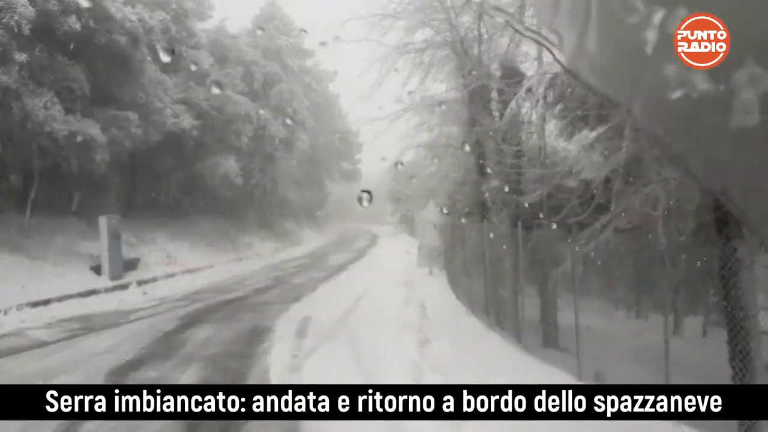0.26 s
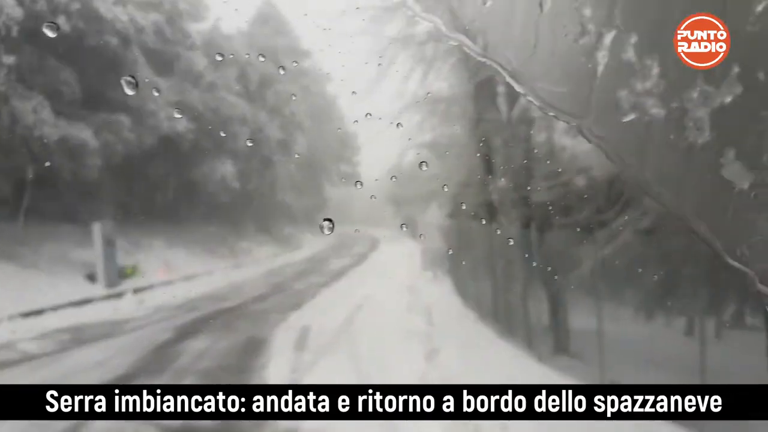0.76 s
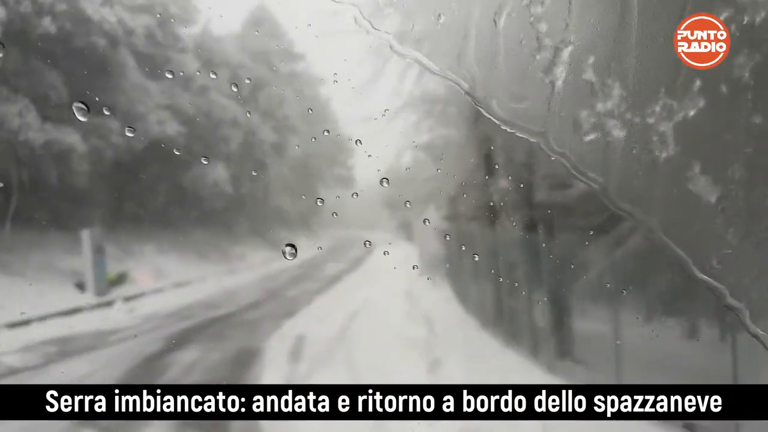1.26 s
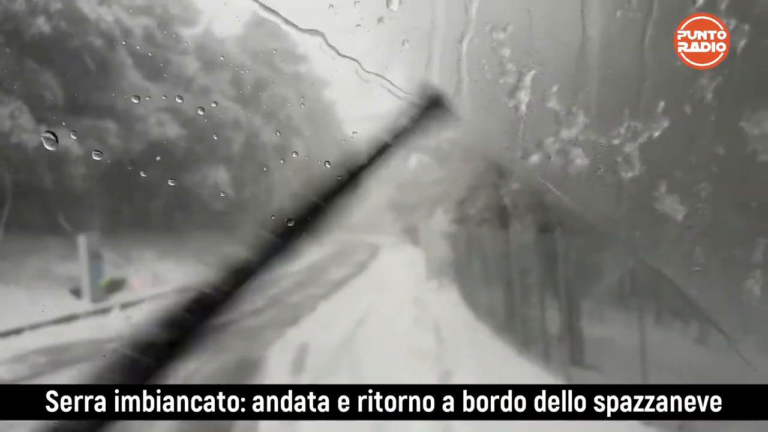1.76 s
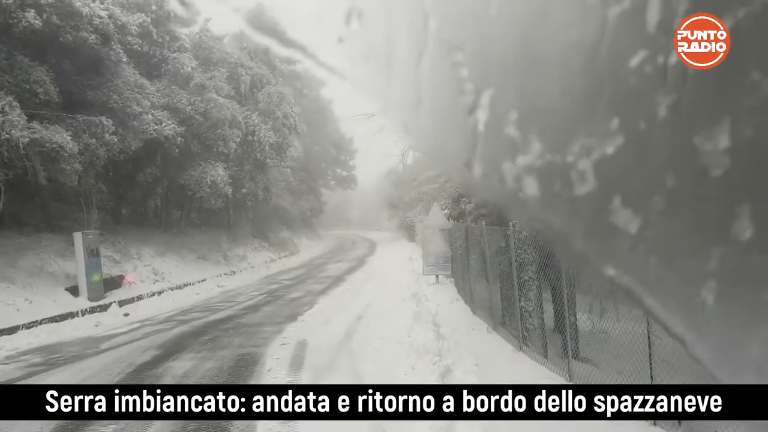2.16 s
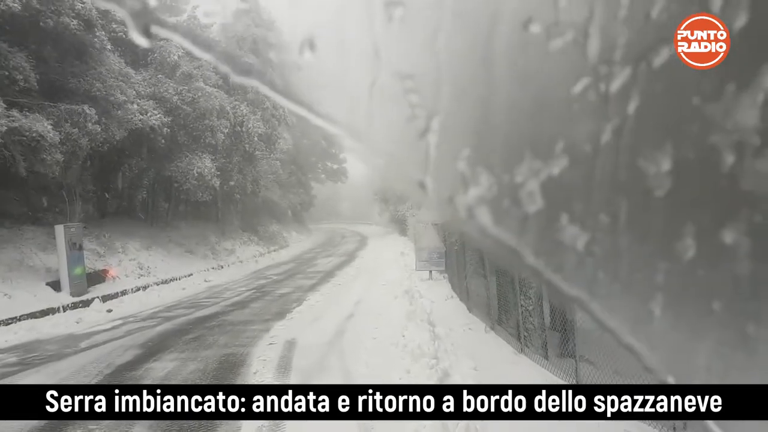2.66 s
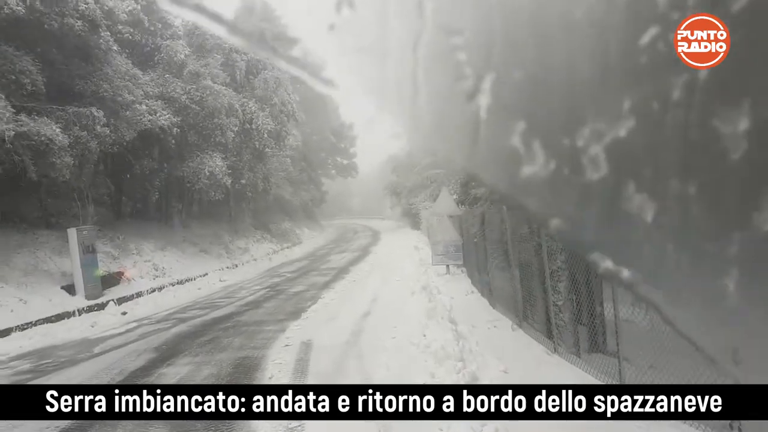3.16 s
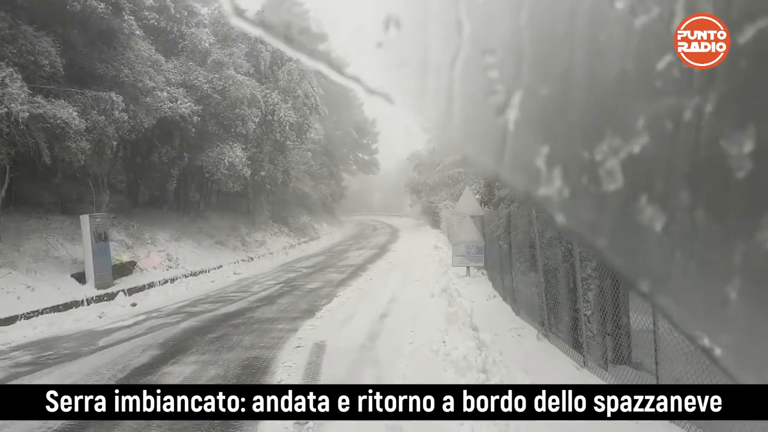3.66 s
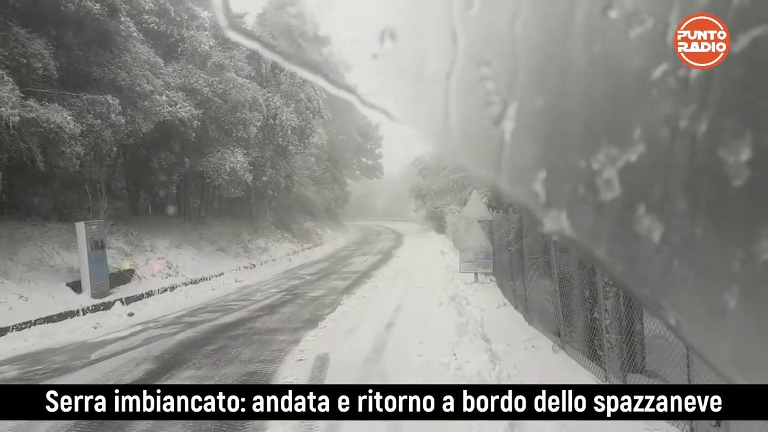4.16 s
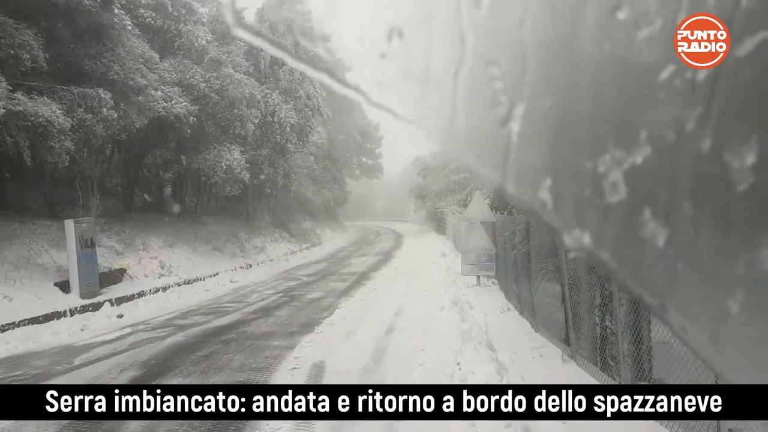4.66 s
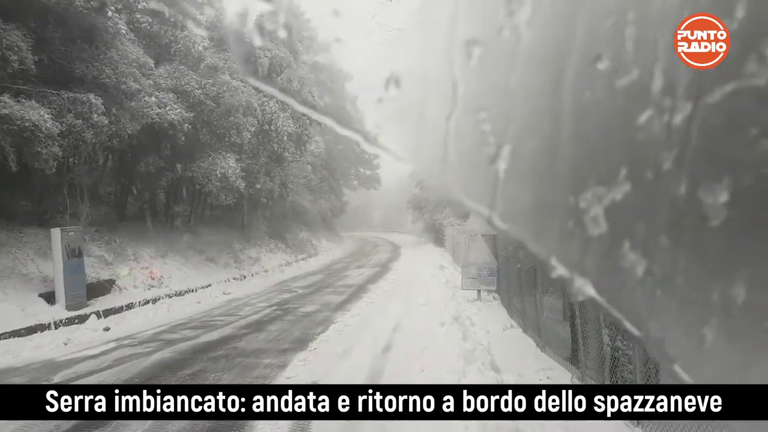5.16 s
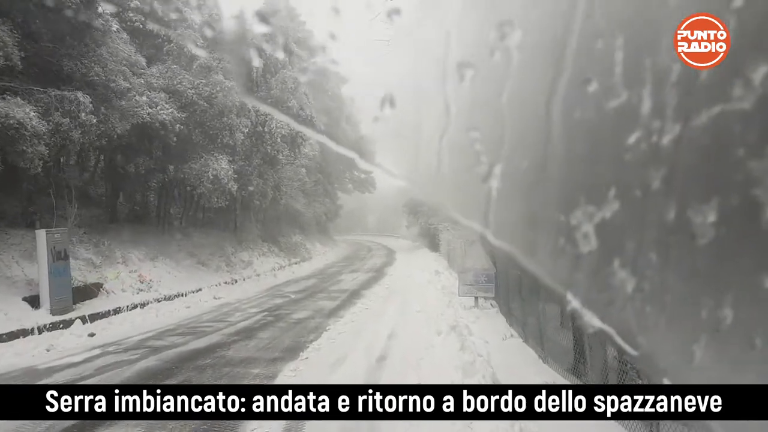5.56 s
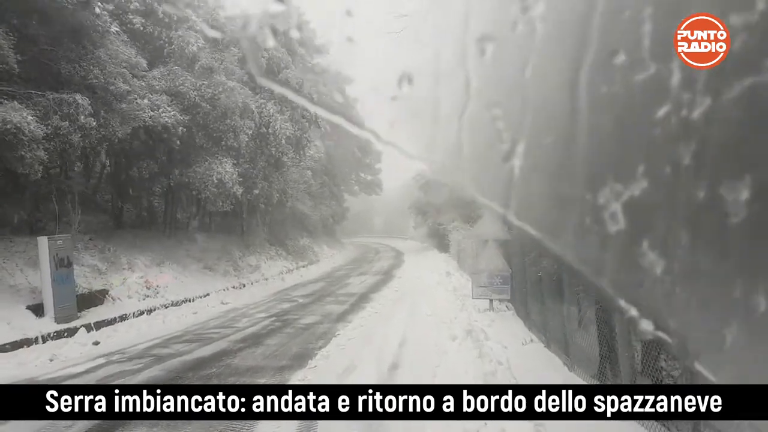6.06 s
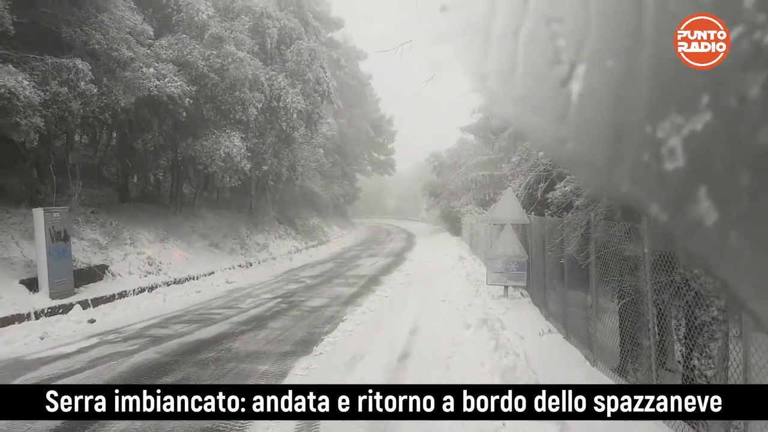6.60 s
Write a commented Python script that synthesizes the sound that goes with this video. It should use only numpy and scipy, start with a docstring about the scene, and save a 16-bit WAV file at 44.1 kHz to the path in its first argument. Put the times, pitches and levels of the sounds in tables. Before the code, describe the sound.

A snowplough truck's diesel engine booms from the start to the end, about seven seconds, heard from inside the cab. The floor rumbles with it, and the low pitch wavers, rising briefly just before 2 seconds and again near the end. Road bumps make the panels drone and loose parts clatter and faintly chirp, while slush hisses very quietly far off. From about 1.3 to 2.1 seconds the wiper drags up and back over the wet windscreen: the rubber sticks and slips, rubbing, squeaking and scraping, and the glass hums with wavering tones. The engine and rattles carry on alone until a second, similar wipe from about 5.9 to 6.7 seconds. A few tiny, bright ticks sound on top, near 1.6, 4.5, 5.8 and 6.3 seconds.

```python
"""A diesel engine booms inside the cab of a snowplough truck, and the floor rumbles with it.
Bumps in the road make panels drone and loose parts clatter, while slush hisses far off.
Twice the wiper drags up and back: its wet rubber sticks and slips, and the windscreen hums.
A few tiny, bright ticks sparkle on top."""
import sys
import numpy as np
from scipy import signal
from scipy.fft import rfft, irfft, next_fast_len
from scipy.io import wavfile
from scipy.ndimage import uniform_filter1d, map_coordinates

SR = 44100
rng = np.random.default_rng(int(sys.argv[2]) if len(sys.argv) > 2 else 0)


def inscribe(sig):
    """Save sig as 16-bit PCM at rate SR to the path in sys.argv[1].

    A 1-D sig is mono; a 2-D sig holds one channel per row.
    Samples are clipped to [-1, 1] before scaling.
    """
    pcm = np.round(np.clip(np.atleast_2d(sig).T, -1, 1) * 32767)
    wavfile.write(sys.argv[1], SR, pcm.astype(np.int16))


N = 301203


def amp(db):
    return 10 ** (np.asarray(db) / 20)


def unit(x):
    """Scale a sound to an average (rms) level of 1."""
    return x / np.sqrt(np.mean(x ** 2) + 1e-20)


def along(points, hz):
    """Read a (pitch_hz, value) table between its rows, on a log pitch scale."""
    pitches, values = np.transpose(points)
    return np.interp(np.log(hz + 1), np.log(pitches + 1), values)


def curves(rows):
    """One value per sample for each column after the time."""
    time_s, *columns = np.transpose(rows)
    return [np.interp(np.arange(N) / SR, time_s, column) for column in columns]


def wobble(rate):
    """A smooth curve through `rate` random values a second."""
    return map_coordinates(rng.standard_normal(int(N * rate / SR) + 4), [np.arange(N) * rate / SR])


def filtered(x, response):
    """Multiply each frequency in x by response(hz)."""
    size = next_fast_len(N + SR // 2)
    return irfft(rfft(x, size) * response(np.fft.rfftfreq(size, 1 / SR)), size)[..., :N]


def rush(spectrum, patchy_db):
    """Stereo noise with the given tone colour and random louder and softer patches."""
    # How alike left and right sound: pitch_hz, likeness (1 = the same)
    alike = [(60, 0.98), (150, 1), (300, 0.77), (600, 0.81), (1200, 0.21), (2500, 0.12), (7000, 0.12),
             (15000, 0.39)]
    grid = signal.stft(rng.standard_normal((2, N)), nperseg=512)[2]
    patches = uniform_filter1d(rng.standard_normal(grid.shape[1:]), size=5, axis=0)
    patches = uniform_filter1d(patches, size=8, axis=1)
    noise = signal.istft(grid * amp(patchy_db * unit(patches)), nperseg=512)[1][:, :N]
    width = lambda hz: np.arccos(along(alike, hz)) / 2
    colour = lambda hz: amp(along(spectrum, hz)) * [np.cos(width(hz)), np.sin(width(hz))]
    mid, side = filtered(noise, colour)
    return unit(np.array([mid + side, mid - side]))


def tone(hz, skew):
    """A gliding sine wave, `skew` radians early on the left and late on the right."""
    phase = 2 * np.pi * (np.cumsum(hz) / SR + rng.random())
    return np.sqrt(2) * np.sin(phase + np.array([[skew], [-skew]]))


def squeaks(count, low_hz, high_hz, cycles):
    """Short gliding chirps at random moments and pitches."""
    when, pitch, glide, size, side = rng.random((count, 5)).T[..., None]
    hz = low_hz * (high_hz / low_hz) ** pitch
    age = np.arange(SR // 10)
    life = np.clip(age / SR * hz / cycles, 0, 1)
    phase = 2 * np.pi * cycles * life * (1 + .12 * (glide - .5) * life)
    swell = np.sin(np.pi * life) ** 2 * amp(10.6 * size) * low_hz / hz
    at = ((when * N).astype(int) + age).ravel()
    chirps = [swell * np.sin(phase + turn * side) for turn in (-2, 2)]
    return unit(np.array([np.bincount(at, channel.ravel(), N + SR)[:N] for channel in chirps]))


def engine():
    """The cab air booms at the engine's firing rate; the floor rumbles above it."""
    # Running engine: time_s, firing_hz, boom_db, rumble_db
    running = [(0.0, 27.4, -46, -19.5), (0.04, 27.7, -22.5, -26), (0.28, 27.7, -22.5, -25),
               (0.32, 28.2, -34, -21.5), (0.38, 31.3, -20, -28.5), (0.44, 34.1, -31, -26.5),
               (0.51, 34, -44, -17.5), (0.57, 31.3, -19, -31), (0.63, 27.5, -30, -20.5),
               (0.7, 27.2, -36, -28), (0.78, 27.6, -21, -23.5), (0.97, 27.5, -36, -26.5),
               (1.06, 25.9, -32, -20), (1.22, 25.9, -14.5, -27), (1.25, 26.8, -36, -27),
               (1.31, 26.5, -24.5, -17.5), (1.43, 26.4, -41, -27.5), (1.46, 27.3, -15, -39),
               (1.54, 28.9, -39, -16.5), (1.61, 32.8, -58, -35), (1.65, 34, -16, -21),
               (1.75, 38, -33, -26.5), (1.84, 38.2, -32.5, -19), (1.88, 37, -19, -27),
               (1.94, 38.4, -28, -25), (2.02, 32.7, -36, -27), (2.05, 29.36, -33, -19),
               (2.11, 28.76, -40, -22), (2.19, 29.0, -25, -24), (2.38, 29.63, -36, -21),
               (2.47, 28.8, -15.5, -25.5), (2.55, 29.2, -40, -22), (2.59, 29.0, -30, -25),
               (2.93, 28.93, -27, -20.5), (3.04, 30.2, -22.5, -28), (3.12, 32.9, -31, -22.5),
               (3.17, 33.3, -17.5, -26), (3.27, 32.35, -53, -24), (3.35, 29.3, -21, -28.5),
               (3.42, 27.86, -40, -18), (3.5, 27.63, -23.5, -25), (3.78, 27.45, -24, -20),
               (3.86, 27.85, -50, -21), (3.92, 29.55, -41, -22), (3.96, 30.6, -45, -22),
               (4.07, 29.8, -21, -28), (4.15, 27.84, -36, -18.5), (4.22, 27.4, -18.5, -18.5),
               (4.55, 28, -38, -21.5), (4.6, 29, -22, -25), (4.77, 31.86, -41, -17),
               (4.91, 30.2, -20.5, -25), (4.94, 30.2, -36, -23), (5.02, 30.3, -31.5, -23.5),
               (5.29, 31.68, -26.5, -21), (5.34, 31.58, -20.5, -18), (5.44, 32.3, -38, -23),
               (5.5, 33.08, -26.5, -25), (5.69, 32.65, -20.5, -24), (5.71, 33.5, -24, -23),
               (5.78, 32.8, -28, -28), (5.9, 33.9, -30, -19), (6.03, 30.1, -28, -22.5),
               (6.18, 30.6, -26, -28.5), (6.3, 30.8, -21.5, -24), (6.43, 30.5, -22, -28),
               (6.47, 30.15, -32, -18.5), (6.54, 32.52, -18, -25), (6.66, 33.28, -16.5, -25.5),
               (6.73, 35.7, -17.5, -24.5), (6.79, 35.3, -30, -26.5), (6.83, 35.7, -22, -21.5)]
    # Tone colour of the floor: pitch_hz, level_db
    floor = [(12, -49), (20, -3.5), (38, -5), (59, -4.5), (156, 1), (230, -15), (300, -31.5), (510, -120)]
    firing_hz, boom_db, rumble_db = curves(running)
    boom = amp(boom_db + 3.3 * wobble(15)) * tone(firing_hz + 1.475 * wobble(8), skew=.04)
    return boom + amp(rumble_db) * rush(floor, patchy_db=.23)


def road():
    """Bumps shake panels and loose parts together; slush sprays far off."""
    # Loudness of each sound (the first two in three stretches): time_s, level_db
    drone_levels = [
        [(0.0, -42), (0.012, -37.5), (0.348, -30), (0.472, -38.5), (0.486, -29), (0.548, -34.5), (0.932, -36.5),
         (1.062, -29.5), (1.09, -34.5), (1.24, -33.5)],
        [(2.08, -44), (2.1, -31), (2.71, -31.5), (2.79, -28.5), (3.08, -37.5), (3.11, -31.5), (3.26, -39),
         (3.28, -33), (3.43, -36.5), (3.56, -33.5), (3.59, -34), (3.89, -29), (4.01, -37), (4.02, -33),
         (4.33, -31), (4.42, -40), (4.46, -30.5), (5.19, -32.5), (5.22, -27), (5.29, -34), (5.35, -28.5),
         (5.5, -34.5), (5.89, -29.5)],
        [(6.7, -36), (6.73, -34), (6.822, -32), (6.83, -39.5)],
    ]
    clatter_levels = [
        [(0.0, -45), (0.182, -44.5), (0.382, -41), (0.454, -44), (0.482, -43.5), (0.51, -53), (0.52, -42),
         (0.614, -44), (0.628, -44.5), (0.638, -48.5), (0.708, -41.5), (0.718, -47.5), (0.78, -40.5),
         (0.828, -44.5), (0.976, -42.5), (0.994, -48.5), (1.042, -42), (1.142, -45.5), (1.232, -42),
         (1.24, -45.5)],
        [(2.08, -47.5), (2.11, -42), (2.26, -44), (2.41, -42), (2.43, -53), (2.45, -40.5), (2.49, -42.5),
         (2.6, -43), (2.64, -44.5), (2.73, -40), (2.89, -43), (2.9, -44), (2.95, -44), (3.12, -44.5),
         (3.13, -53), (3.18, -42), (3.23, -43.5), (3.5, -42.5), (3.66, -43.5), (3.7, -42.5), (3.72, -46.5),
         (3.77, -41), (3.81, -51), (3.82, -42.5), (3.92, -42), (3.95, -44.5), (4.06, -42.5), (4.11, -50),
         (4.12, -41), (4.25, -40), (4.44, -42.5), (4.46, -41), (4.59, -40.5), (4.68, -46), (4.71, -39.5),
         (4.82, -43), (4.93, -43.5), (4.94, -47), (5.04, -42), (5.05, -45), (5.07, -43.5), (5.21, -40),
         (5.26, -42), (5.39, -40.5), (5.43, -47.5), (5.45, -41), (5.53, -43), (5.63, -43.5), (5.72, -44.5),
         (5.74, -43.5), (5.85, -43), (5.87, -54), (5.89, -40)],
        [(6.7, -43.5), (6.8, -40.5), (6.83, -40.5)],
    ]
    hiss_levels = [(0.0, -77), (0.17, -72.5), (0.3, -70.5), (0.97, -72.5), (1.86, -71), (2.49, -66),
                   (2.64, -67.5), (3.12, -71), (3.44, -73.5), (4.03, -71), (4.57, -70), (4.87, -72.5),
                   (5.14, -72.5), (5.36, -69), (5.73, -72), (6.28, -73), (6.49, -73), (6.83, -74)]
    # Tone colours: pitch_hz, level_db
    panels = [(120, -49), (200, -10.5), (268, -9), (312, -7.5), (356, -2), (397, -10), (446, -6.5),
              (488, -3), (547, -10.5), (580, -14), (700, -25), (910, -56), (1540, -120)]
    loose_parts = [(360, -58), (620, -36), (715, -8.5), (1090, 1.5), (1240, -1.5), (1340, -1), (1440, -1),
                   (2650, -5), (4600, -15), (6000, -24), (7800, -65), (13200, -120)]
    spray = [(4500, -56.5), (5500, -17.5), (7070, -16), (7700, -22), (8300, -17), (9900, -25.5),
             (10600, -18), (12500, -16.5), (14800, -30), (15300, -28.5), (15900, -28)]
    drone_db, = curves(np.concatenate(drone_levels))
    clatter_db, = curves(np.concatenate(clatter_levels))
    hiss_db, = curves(hiss_levels)
    shake = wobble(23)
    jolt_db = clatter_db - np.mean(clatter_db)  # a jolt reaches the panels and the hiss too
    drone = amp(drone_db + .43 * jolt_db + .4 * shake) * rush(panels, patchy_db=1.2)
    trim = squeaks(count=900, low_hz=700, high_hz=4480, cycles=39.6)  # loose trim chirps faintly
    clatter = amp(clatter_db + .53 * shake) * (rush(loose_parts, patchy_db=.3) + .63 * trim)
    hiss = amp(hiss_db + 11 + .26 * jolt_db + .5 * shake) * rush(spray, patchy_db=.8)
    return drone + clatter + hiss


def ticks():
    """Short bright puffs of noise with a sharp start."""
    # Each tick: start_s, level_db, fade_s (time to fall by 60 dB)
    puffs = [(1.626, -56.5, 0.07), (4.229, -73, 0.058), (4.529, -61.5, 0.061), (5.7914, -67, 0.05),
             (6.255, -58, 0.062)]
    # Their tone colour: pitch_hz, level_db
    colour = [(4000, -28), (6000, -22.5), (8500, -26), (10500, -12.5), (13000, -11), (15800, -18.5)]
    loudness, t = np.zeros(N + SR), np.arange(SR // 8) / SR
    for start_s, level_db, fade_s in puffs:
        loudness[round(start_s * SR):][:len(t)] += amp(level_db + 16.5 - 60 * t / fade_s)
    return loudness[:N] * rush(colour, patchy_db=5)


def windscreen(notes):
    """The glass hums at four wavering pitches as the blade catches and lets go."""
    columns = curves(notes)
    return sum(amp(db + 4 * wobble(40)) * tone(hz * (1 + .01537 * wobble(50)), skew)
               for hz, db, skew in zip(columns[0::2], columns[1::2], (.15, .4, .7, .9)))


def wiper():
    """Wet rubber sticks and slips on the glass: it rubs, squeaks, scrapes and fizzes."""
    # Blade loudness, one list per wipe: time_s, drag_db, scrape_db, fizz_db (both added to drag_db)
    wipes = [
        [(1.255, -31, 8, -11), (1.271, -32, -7.5, -19), (1.291, -27, -3, -15.5), (1.471, -30.5, -5, -26),
         (1.523, -26.5, -2.5, -22), (1.591, -30, -6.5, -23), (1.619, -30, -3, -19), (1.639, -26, -9, -25),
         (1.675, -28.5, -4, -21), (1.779, -26.5, -4.5, -26.5), (1.787, -28.5, -3, -24), (1.909, -30, -7, -23.5),
         (2.025, -43, -2.5, -15), (2.055, -40, -8, -16), (2.1, -42, -6, -12)],
        [(5.905, -51, -13, -25), (5.923, -27.5, -6, -18), (6.017, -29, 0, -18), (6.091, -27.5, -9, -33),
         (6.135, -36.5, 0, -16), (6.159, -26, -5.5, -30), (6.211, -32, -5, -30), (6.257, -30, -7, -19),
         (6.317, -25.5, -9.5, -31), (6.337, -28.5, -2, -23), (6.461, -23.5, -6.5, -24.5),
         (6.477, -24.5, -8, -31), (6.565, -35.5, -3, -29), (6.631, -35.5, -9, -30), (6.7, -42, -7, -22)],
    ]
    # Glass notes, one list per wipe: time_s, then four pairs of pitch_hz, level_db
    hums = [
        [(1.255, 186.8, -39.5, 322.7, -28, 424.6, -41, 484, -29),
         (1.279, 175.8, -16.5, 323.3, -23.5, 400.5, -16, 478, -23),
         (1.317, 163.1, -23.5, 327.3, -25.5, 403, -32, 470, -31),
         (1.359, 164.3, -28.5, 356.3, -17, 431.3, -23, 527, -27),
         (1.409, 248.7, -28.5, 350.2, -25, 451, -35, 509.5, -26),
         (1.501, 238.4, -20, 343.6, -30, 468.6, -29, 471, -37),
         (1.553, 241.6, -24, 357.4, -33.5, 438.2, -28, 477.3, -31),
         (1.635, 210.5, -23.5, 352.8, -30.5, 415.3, -23.5, 479, -28),
         (1.691, 199.4, -20, 346.3, -24, 443, -15, 470.7, -20),
         (1.727, 175.6, -42.5, 351, -16.5, 411.8, -21, 478, -28),
         (1.779, 161.6, -19, 331.9, -35, 428.6, -17, 487, -19),
         (1.809, 168.3, -29.5, 337, -22, 452.3, -26.5, 482, -24),
         (1.975, 151.7, -40.5, 369, -20, 423.4, -18, 470.3, -24),
         (2.021, 165.3, -28.5, 332.6, -51, 455, -28, 477.6, -34), (2.1, 151, -36, 346, -43, 456, -48, 503, -44)],
        [(5.905, 186.4, -29, 324, -35, 467, -31, 473.0, -40),
         (5.953, 159.2, -30, 321.8, -24, 450, -27, 469.5, -29),
         (6.027, 159.1, -29.5, 350.4, -23, 409.8, -21.5, 506, -33),
         (6.103, 160.1, -25.5, 351, -15.5, 461.7, -35.5, 480, -34),
         (6.171, 167.5, -30.5, 345.3, -27.5, 415.6, -33, 502, -48),
         (6.211, 191, -20.5, 369.4, -29, 413.7, -29, 477, -30),
         (6.267, 158.3, -29.5, 350.3, -23.5, 432, -31, 468, -24),
         (6.303, 163.6, -33, 343.1, -31, 467.7, -30, 491, -22),
         (6.341, 158.4, -33, 336.5, -28.5, 419.7, -20.5, 474, -21),
         (6.477, 158.2, -34, 350.3, -19.5, 417.3, -18.5, 480.6, -25),
         (6.547, 199.3, -26, 351, -29, 440, -22, 475.8, -26),
         (6.585, 193.7, -37, 351.7, -32, 444, -14.5, 474, -19),
         (6.627, 144.6, -40, 384.4, -44, 450, -28, 470, -31),
         (6.663, 154.4, -33.5, 340.8, -57, 459, -58, 470, -56), (6.7, 150, -18, 329, -41, 464, -36, 480, -30)],
    ]
    # Tone colours of the wet blade: pitch_hz, level_db
    rub_colour = [(76, -61.5), (130, -20.5), (150, -6), (233, -2.5), (298, -11), (347, -0.5), (385, -12),
                  (426, -7), (603, -16.5), (662, -12), (863, -17.5), (1080, -14.5), (1500, -25.5),
                  (1950, -71), (3300, -120)]
    scrape_colour = [(880, -27), (1500, -10), (1880, -6.5), (2580, -19), (2980, -21.5), (3500, -25.5),
                     (4550, -58.5), (7700, -120)]
    fizz_colour = [(2060, -31), (3500, -3.5), (4600, -9.5), (7450, -21), (8280, -23.5), (10000, -27),
                   (13000, -56), (22000, -120)]
    out, t = np.zeros((2, N)), np.arange(N) / SR
    judder = amp(1.4 * wobble(45))
    rub = judder * rush(rub_colour, patchy_db=2.7)
    squeak = squeaks(count=420, low_hz=561.3, high_hz=2295, cycles=43)
    scrape = judder * rush(scrape_colour, patchy_db=1.6)
    fizz = judder * rush(fizz_colour, patchy_db=3.5)
    for wipe, notes in zip(wipes, hums):
        start_s, end_s = wipe[0][0], wipe[-1][0]
        moving = np.clip(np.minimum((t - start_s) / .0052, (end_s - t) / .026), 0, 1)  # fade in, out
        drag_db, scrape_db, fizz_db = curves(wipe)
        drag = amp(7.5) * rub + amp(-3.5) * squeak + amp(scrape_db) * scrape + amp(fizz_db) * fizz
        out += moving * (amp(drag_db) * drag + windscreen(notes))
    return out


def scene():
    return engine() + road() + wiper() + ticks()


def record(dry):
    """Two microphones differ in level and timing; the deepest bass and highest treble are cut."""
    # Left level minus right: pitch_hz, level_db
    louder = [(60, 0), (150, -2.5), (380, 0.5), (950, -2.5), (2380, -4.5), (5980, 0.5), (15000, 0.5)]
    # How much sooner the left hears: pitch_hz, lead_s
    lead = [(250, 0), (700, 0), (3000, 0), (6000, 0.0035)]
    bottom_hz, top_hz = 18, 15850
    half = np.array([[.5], [-.5]])
    balance = lambda hz: amp(half * along(louder, hz))
    timing = lambda hz: np.exp(2j * np.pi * hz * half * along(lead, hz))
    band = lambda hz: (hz < top_hz) / np.sqrt(1 + (bottom_hz / (hz + 1)) ** 6)
    return filtered(dry, lambda hz: balance(hz) * timing(hz) * band(hz))


dry = scene()
out = record(dry)
inscribe(out)
```